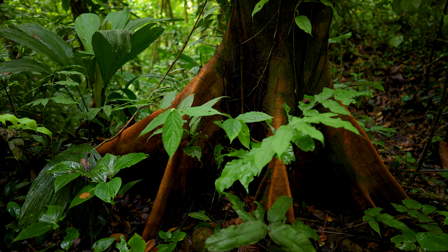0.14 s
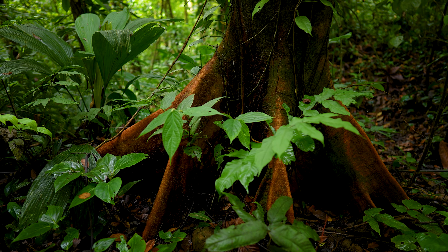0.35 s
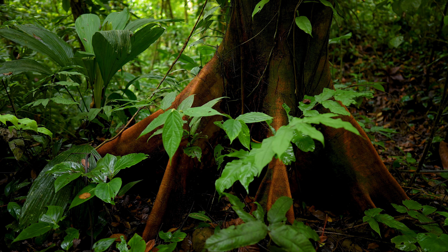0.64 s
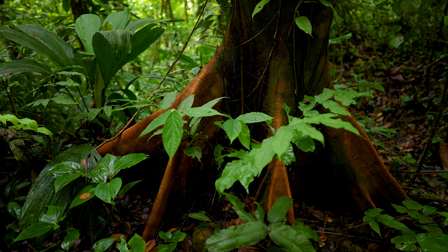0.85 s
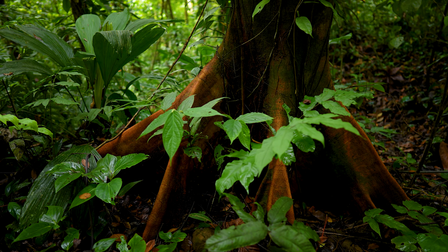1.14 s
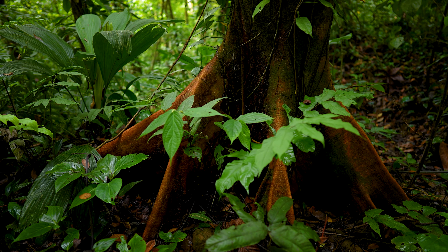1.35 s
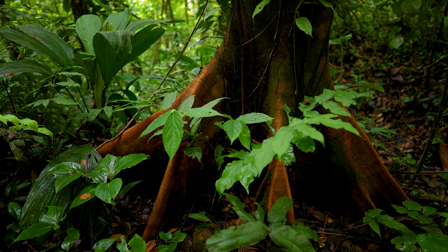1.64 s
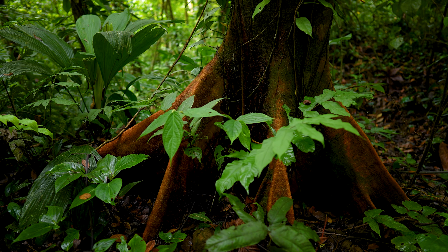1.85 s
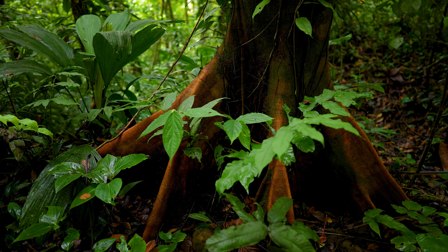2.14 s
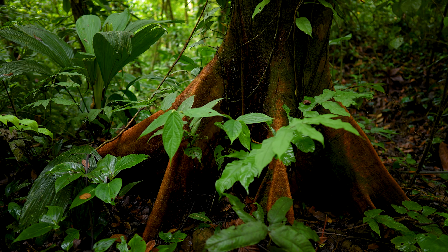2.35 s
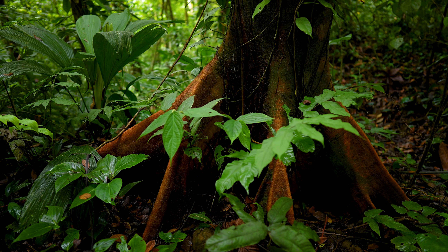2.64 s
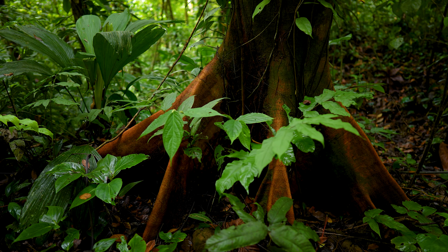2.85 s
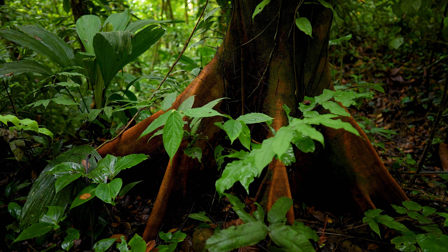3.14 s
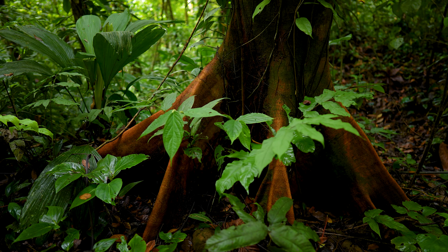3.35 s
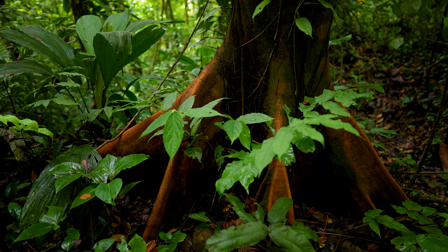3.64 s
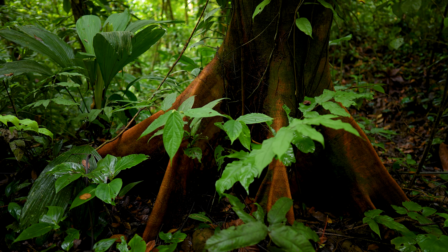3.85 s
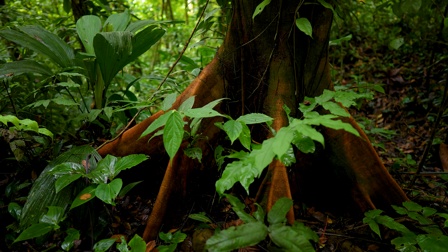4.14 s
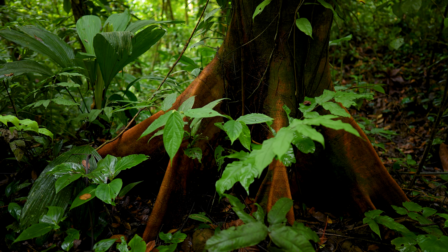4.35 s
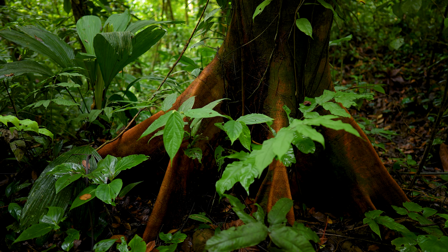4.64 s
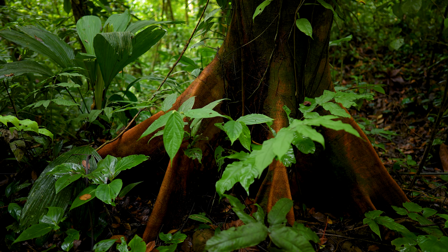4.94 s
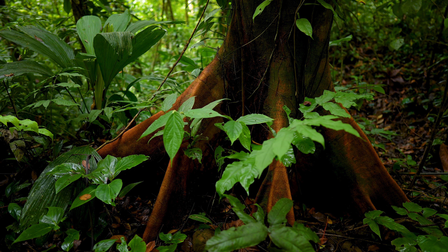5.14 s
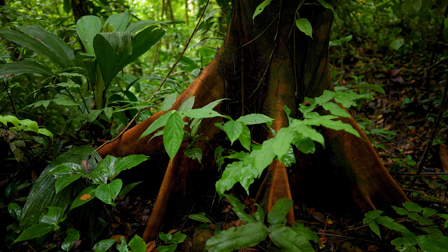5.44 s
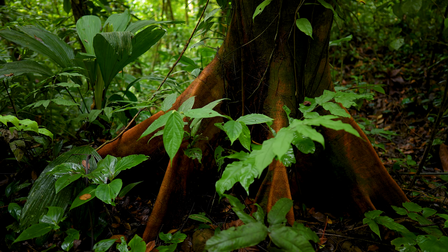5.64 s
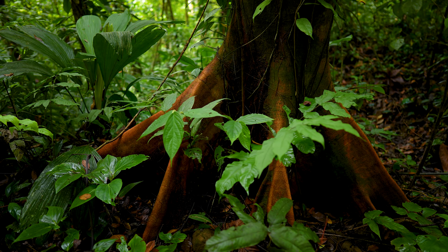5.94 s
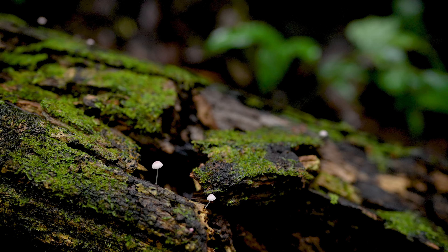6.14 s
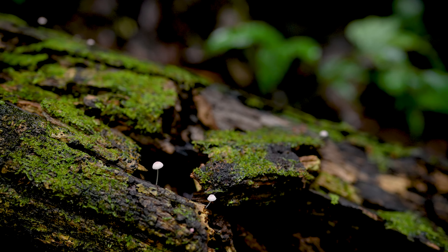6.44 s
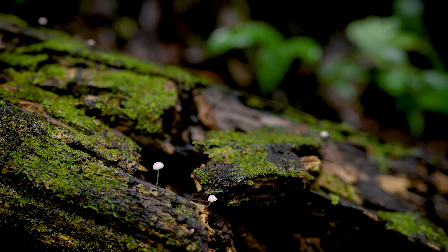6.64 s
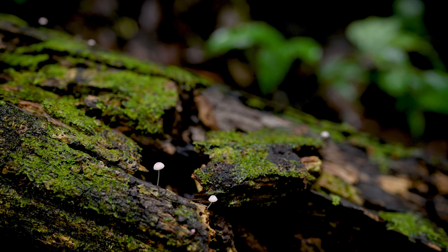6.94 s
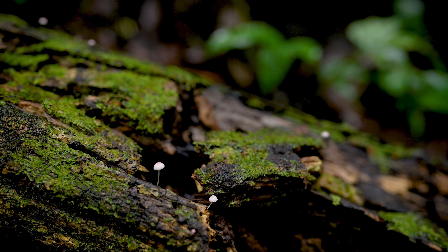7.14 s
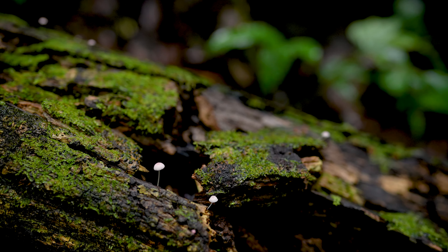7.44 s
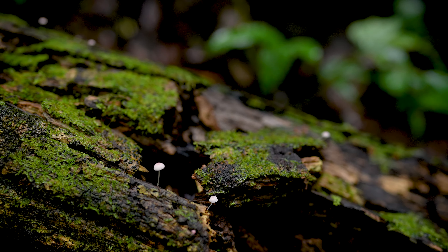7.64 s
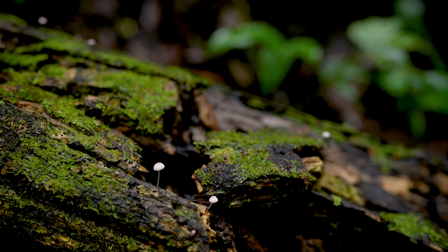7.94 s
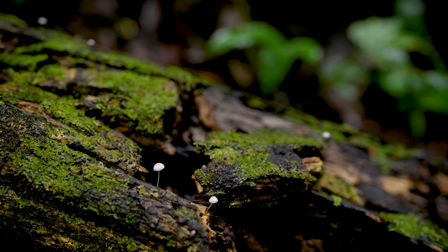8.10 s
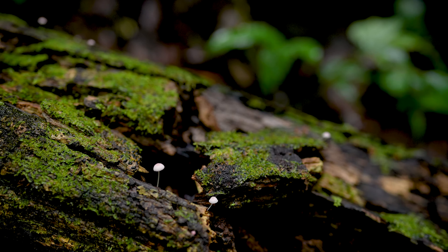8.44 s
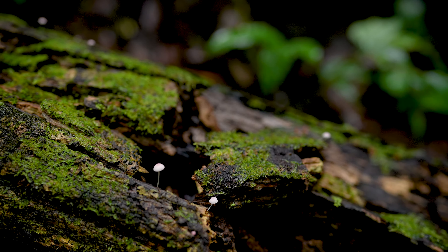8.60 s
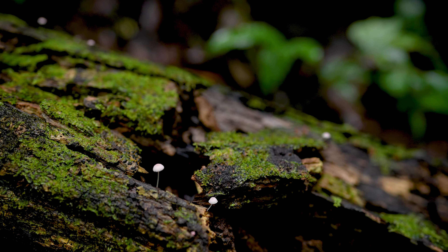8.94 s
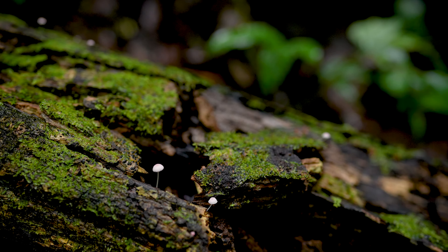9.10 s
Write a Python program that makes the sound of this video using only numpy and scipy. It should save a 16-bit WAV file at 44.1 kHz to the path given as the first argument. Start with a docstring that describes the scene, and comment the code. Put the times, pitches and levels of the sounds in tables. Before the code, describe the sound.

Daytime rainforest in stereo, beneath a big tree among wet leaves. A high insect drone never stops. A bird repeats short arched notes at about six a second, another yelps between them, and deeper in come paired low hoots, rising whistles and thin pips. Just after six seconds the spot changes abruptly: a loud cricket trills close by, the birds sound drier, and a quick warble rings out.

```python
"""A steady drone of crickets and katydids comes first, in a daytime rainforest heard from two spots in turn.
Over it a bird runs through long trills of arched notes, while a second yelps between them.
Deeper in the trees come double hoots, rising whistles, a warble, held notes, and a few drips on leaves.
Insect choirs are band-shaped noise, calls are tones along pitch contours, drips are damped leaf modes;
decaying random echoes give each singer its distance."""
import sys
import numpy as np
from scipy import signal
from scipy.fft import rfft, irfft, next_fast_len
from scipy.io import wavfile
from scipy.ndimage import uniform_filter1d

SR = 44100
rng = np.random.default_rng(int(sys.argv[2]) if len(sys.argv) > 2 else 0)


def inscribe(sig):
    """Save sig as 16-bit PCM at rate SR to the path in sys.argv[1].

    A 1-D sig is mono; a 2-D sig holds one channel per row.
    Samples are clipped to [-1, 1] before scaling.
    """
    pcm = np.round(np.clip(np.atleast_2d(sig).T, -1, 1) * 32767)
    wavfile.write(sys.argv[1], SR, pcm.astype(np.int16))


N = 408807
TIME = np.arange(N) / SR
MOVE_S = 6.175  # the listening spot changes
CUTOFF_HZ = 15200
WASH_DB = -52.5
YELP_HZ, BUZZ_HZ = 1277, 6335
PIP_LENGTH_S = .07
FULL_PITCH_HZ, TRILL_DB_PER_OCTAVE = 1242, 27  # lower trill notes are softer

# Source levels below are those before echo, panning and the gain of the source's own function.
# spectrum of the far forest's wash: pitch_hz, relative density_db (per Hz)
AIR = [(15, -10), (45, 1), (170, -2.5), (450, .5), (650, -1), (1100, 2.5), (1800, -1.4), (3100, -3.5),
       (4500, -4), (6600, -2), (7800, -22.5), (15500, -22.5)]
# insect choirs: first_spot_db, second_spot_db, pulse_rate_hz, pulse_depth (0-1),
# spectrum (pitch_hz, relative density_db per Hz)
CHOIRS = [ (-41.5, -39, 36, 0.063, [(6550, -46), (6850, -17.5), (7050, -7.5), (7230, -1), (7340, 1),
          (7420, -2.5), (7520, -19), (7700, -41), (8100, -46)]), (-44.5, -51.5, 71, 0.056, [(7900, -24),
          (8200, -14.5), (8450, -6.5), (8950, -1.5), (9400, -6.5), (10000, -17.5), (10700, -29),
          (11500, -71)]), (-50, -69, 9.1, 0.23, [(5400, -41), (5750, 5), (5900, 5.5), (6080, 13),
          (6250, 1.5), (6450, -31), (6700, -37)]), (-63, -50.5, 11, 0.38, [(3400, -4), (4000, -3.5),
          (4550, -1), (4850, -5.5), (5500, -1), (5700, 3.5), (5900, 11.5), (6020, -14), (6170, 7),
          (6320, -3), (6440, 7), (6600, -10)]), (-64, -62.5, 30, 0.26, [(2100, -25), (2350, -3.5),
          (2500, 7), (2770, 5), (2900, -23)]), (-74, -71.5, 46.5, .3, [(13800, -7), (14700, -7), (15000, 0),
          (15400, -34)])]
# bouts of a cricket, far and near: start_s, end_s, chirp_rate_hz, level_db
FAR_CRICKET = [(0, 6.17, 15.9, -42)]
NEAR_CRICKET = [(6.198, 7.1, 14.96, -30.2), (7.13, 7.65, 15.1, -39), (7.684, 8.7, 15.25, -30.5),
                (9.196, 9.27, 16.5, -31)]

# short insect buzzes: start_s, length_s, level_db
BUZZES = [(0.43, 0.33, -49.5), (2.435, 0.14, -45.5), (3.342, 0.2, -45), (4.926, 0.14, -45.5),
          (6.075, 0.1, -46)]
# sinking calls of distant birds, hoarse falling squawks, swells of a rasping insect:
# start_s, length_s, pitch_hz (mid-note), level_db
FAR_CALLS = [(0, 1, 2423, -57.5), (.05, 0.96, 2690, -59.5), (2.753, .38, 2470, -57.5),
             (3.55, 0.45, 2462, -56.5), (4.75, 0.83, 2703, -57.5), (8.95, 0.41, 2608, -57.5)]
SQUAWKS = [(5.05, 0.081, 1336, -45), (5.68, 0.29, 3140, -47), (5.84, 0.17, 2440, -51.5),
           (6.04, 0.1176, 1311, -48), (6.13, .32, 2538, -51)]
RASPS = [(1.85, 0.45, 5350, -54.5), (2.45, 1.2, 4760, -58), (6.15, 2.64, 4440, -55)]
# runs of thin pips: first_s, last_s, pip_count, pitch_hz, first_level_db, last_level_db
PIPINGS = [(1.719, 2.15, 5, 3470, -56, -52.5), (4.18, 4.541, 5, 3480, -53.5, -49),
           (4.64, 4.88, 3, 3490, -51, -62), (6.211, 6.28, 2, 3540, -52, -58),
           (7.9, 8.26, 8, 3460, -56, -61)]

# drips on leaves: start_s, level_db
DRIPS = [(3.125, -42), (7.909, -51)]
# modes of a leaf: pitch_hz, level_db, t60_s
LEAF = [(1540, 1.5, 0.047), (2340, 19, 0.0034), (2900, 6, 0.016), (4040, 6.5, 0.0093)]

# distant wail: bend_s, pitch_hz, level_db
WAILS = [(5.91, 1583, -41.5)]
# its fall and level end: offset_s from the bend, pitch_ratio, level_db
WAIL = [(-.08, 1.4, -8), (-.04, 1.22, -3), (0, 1.01, -0.5), (0.101, .98, 0.5), (.15, .85, -24)]
# rising whistles: rise_start_s, pitch_hz, level_db
WHISTLES = [(1.055, 1760, -45.5), (5.705, 1765, -47)]
# plunge, level stretch, long rise: offset_s from the start of the rise, pitch_ratio, level_db
WHISTLE = [(-.268, 2.0, -2), (-.248, 1.55, -4), (-.232, 1.2, -7), (-.21, 1.07, -13), (-.14, 1.01, -13),
           (0, 1, -13), (.06, 1.11, -6), (.115, 1.32, -3.5), (.16, 1.52, -1.5)]
# hoots, in pairs: time_s, pitch_hz, level_db
HOOTS = [(.985, 380, -40), (1.3, 376, -39.5), (2.085, 441, -47.5), (2.42, 443, -47.5), (6.96, 441, -48),
         (7.305, 444, -47.5)]
# rising first hoot, then level second hoot: offset_s from its time, pitch_ratio, level_db
RISING_HOOT = [(-.055, 0.8, -11.5), (-.033, .96, -4.5), (0, 1.01, 0.5), (0.02, 1.04, 2.5),
               (0.041, 1.33, -24)]
LEVEL_HOOT = [(-.05, 0.94, -20), (-.03, 0.99, 0), (.015, 1.0, -3), (.045, 0.83, -35)]

# songbird's syllables: offset_s from the turn, pitch_ratio, level_db
SWOOP = [(-.037, 0.94, -19), (-.022, 1.14, -1.5), (-.008, 1.05, -3), (0, 1, -1), (.008, 1.12, 3.5),
         (0.018, 1.43, -4), (0.028, 1.32, 5.5), (.04, 1.08, -18)]
LOW_SWOOP = [(-.052, .92, -22), (-.035, 1.13, -1), (-.012, 1.02, -2.5), (.005, 1, -0.5), (.016, 1.3, 4.5),
             (0.025, 1.44, 0), (.036, 1.1, -6), (.052, .82, -9)]
SLIDE = [(-.04, 1.69, -12), (-.017, 1.4, 1), (0, 1, -1), (.02, .82, -7), (0.039, .66, -17.5)]
CHIP = [(-.02, 0.82, -17), (-.006, .99, -2), (.003, 1.01, 1), (0.021, 1.16, -3), (.034, .9, -5),
        (.046, .88, -6), (.056, 0.83, -24)]
PIP = [(-.02, 0.88, -11), (0, 1, 8), (.012, 1.02, -12)]
# its song: time_s into the song, pitch_hz, level_db, syllable
SONG = [(.037, 4600, -32, SWOOP), (.165, 3774, -32.5, LOW_SWOOP), (.25, 3400, -44.5, PIP),
        (.373, 4880, -31.5, SWOOP), (.525, 4210, -31.5, SLIDE), (.584, 4346, -28, CHIP)]
# sung far off, then nearby: start_s, level_db, echo_db, echo_t60_s, echo_build_s, pan_db
SONGS = [(.955, -11.5, 22, 1.44, 0.037, 0.5), (7.055, -0.5, 1, 0.56, 0.0022, -1.5)]

# yelps: break_s (where the pitch breaks down), level_db
YELPS = [(0.141, -38.5), (0.487, -40), (0.781, -38.5), (1.075, -39.5), (2.124, -40.5), (2.851, -40),
         (3.623, -42), (4.471, -40.5), (5.031, -40.5), (5.17, -46.5), (6.189, -40), (6.419, -38),
         (6.671, -39.5), (6.901, -39), (7.333, -39), (7.647, -39.5), (7.914, -38), (8.189, -41),
         (8.446, -39), (8.769, -39.5), (9.045, -38.5), (9.296, -38.5)]
# one yelp: offset_s from the break, pitch_ratio, level_db
YELP = [(-.047, .48, -21), (-.038, 0.97, -5), (-.025, 1.01, 0), (-.008, .93, -11), (0, .95, 5.5),
        (.007, .68, -14), (.016, .62, -16.5), (.03, .46, -17.5)]

# trill runs of even pace, far and near: first_s, last_s, note_count, level_db (at full pitch)
FAR_RUNS = [(.368, 1.189, 5, -35.7), (1.368, 2.09, 5, -34.3), (2.246, 2.558, 3, -34.7),
            (2.742, 3.033, 3, -34.2), (3.172, 3.988, 7, -34.2), (4.12, 4.92, 7, -35.5),
            (5.092, 5.433, 3, -35.5), (5.763, 5.763, 1, -42), (6.1, 6.1, 1, -35)]
NEAR_RUNS = [(6.246, 6.823, 4, -36), (7.003, 7.372, 3, -35.4), (7.571, 7.757, 2, -35.2),
             (7.964, 8.374, 3, -36), (8.596, 8.596, 1, -33.5)]
# the trill holds its pitch, then sinks as the bird tires: time_s, pitch_hz (reference of the arch)
FAR_PITCH = [(.36, 1237), (3.3, 1263), (4.52, 1237), (4.65, 1055), (5.43, 900), (5.76, 1240)]
NEAR_PITCH = [(6.24, 1249), (7.96, 1242), (8.38, 1200), (8.586, 926.5)]
# far note, a scoop into a short top; near note, a full arch: offset_s from the top, pitch_ratio, level_db
SCOOP = [(-.028, .72, -16), (-.016, .86, -9.5), (-.008, 1.025, -2.5), (.003, 1.02, -.5), (.011, 1.0, -3),
         (.015, .88, -16), (.036, .6, -29)]
ARCH = [(-.028, .6, -23), (-.018, .76, -11.5), (-.012, .9, -8.5), (-.007, 1.035, 0), (.01, .985, 1.2),
        (.014, .85, -11), (.019, .68, -14), (.028, .55, -27)]


def from_db(db):
    """Level to amplitude: twenty decibels per factor of ten."""
    return 10 ** (np.asarray(db) / 20)


def rms_one(x):
    """Normalization to unit effective value."""
    return x / np.sqrt(np.mean(x ** 2) + 1e-20)


def drift(rate_hz):
    """Low-passed noise: smooth chance of spread 1 that turns about `rate_hz` times a second."""
    size = next_fast_len(N)
    lowpass = 1 / (1 + (np.fft.rfftfreq(size, 1 / SR) / rate_hz) ** 4)
    return rms_one(irfft(rfft(rng.standard_normal(size)) * lowpass, size)[:N])


def diffuse(spectrum, alike_below_hz=150):
    """Diffuse field: shaped noise of rms 1, partly alike at both ears only for long waves."""
    size = next_fast_len(N)
    hz = np.fft.rfftfreq(size, 1 / SR) + 1
    points, db = np.transpose(sorted(spectrum))
    gain = from_db(np.interp(np.log(hz), np.log(points), db, -np.inf, -np.inf))
    alike = .5 / (1 + (hz / alike_below_hz) ** 2)
    mid, side = rfft(rng.standard_normal((2, size))) * gain
    ears = np.sqrt(1 + alike) * mid + np.sqrt(1 - alike) * side * [[1], [-1]]
    return rms_one(irfft(ears, size)[:, :N])


def forest(x, wet_db, t60, pan_db=0., lag_s=0., build_s=0.0036):
    """Multiple scattering: echoes from trunks and leaves build and die; power is roughly kept before panning."""
    t = np.arange(SR) / SR
    envelope = from_db(-60 * t / t60) * (1 - np.exp(-t / build_s))
    scatter = rng.standard_normal((2, SR)) * envelope
    echoes = signal.fftconvolve(x[None], scatter, axes=1)[:, :N]
    echoes *= x.std() / echoes.std(axis=1, keepdims=True)
    direct = np.array([x, np.roll(x, round(lag_s * SR))])  # the right ear hears it later by lag_s
    blend = (direct + from_db(wet_db) * echoes) / np.hypot(1, from_db(wet_db))
    return blend * from_db([[pan_db / 2], [-pan_db / 2]])


def echoed(x, delay_s, echo_db):
    """Single reflection: a big trunk throws the call back once."""
    lag = max(round(delay_s * SR), 1)
    return x + from_db(echo_db) * np.pad(x, (lag, 0))[:N]


def hoarse(x, rough, rate_hz):
    """Random amplitude modulation: a tone's strength flutters, with its power roughly kept."""
    return x * (1 + rough * drift(rate_hz)) / np.hypot(1, rough)


def mix_in(out, start_s, sound):
    """Superposition: adds a sound in place at its time."""
    i = max(int(start_s * SR), 0)
    out[i:i + len(sound)] += sound[:max(N - i, 0)]


def syllable(contour, overtones_db, throat_hz):
    """Harmonic source and throat filter: a tone's start and wave; overtones above throat_hz are damped."""
    s, hz, db = np.transpose(sorted(contour))
    t = np.arange(s[0], s[-1], 1 / SR)
    hz = uniform_filter1d(np.interp(t, s, hz), size=200)
    phase = 2 * np.pi * np.cumsum(hz) / SR
    tone = np.sin(phase)
    for k, overtone_db in enumerate(overtones_db, 2):
        damping = np.hypot(1, (k * hz / throat_hz) ** 12)
        tone += from_db(overtone_db) * np.sin(k * phase) / damping
    envelope = from_db(np.interp(t, s, db)) * signal.windows.tukey(len(t), .1)
    return s[0], np.sqrt(2) * envelope * tone


def calls(notes, shape, overtones_db, throat_hz, spread=0.064):
    """Scaled contours: one shape at each note's time, pitch and level, its length and sweep varying a little."""
    out = np.zeros(N)
    variations = 1 + spread * rng.standard_normal((len(notes), 2))
    for (s, hz, db), (stretch, sweep) in zip(notes, variations):
        contour = [(s + dt * stretch, hz * ratio ** sweep, db + d) for dt, ratio, d in shape]
        mix_in(out, *syllable(contour, overtones_db, throat_hz))
    return out


def held(notes, fall, waver_hz):
    """Frequency modulation: tones swell and fade, sink by the share `fall` of their pitch and waver."""
    out, waver = np.zeros(N), drift(175.4)
    for start, length, pitch_hz, db in notes:
        count = max(int(length * SR), 2)
        glide_hz = pitch_hz * (1 - fall * np.linspace(-.5, .5, count))
        hz = glide_hz + waver_hz * np.roll(waver, -int(start * SR))[:count]
        tone = np.sqrt(2) * np.sin(2 * np.pi * np.cumsum(hz) / SR)
        mix_in(out, start, from_db(db) * signal.windows.tukey(count, .4) * tone)
    return out


def air():
    """Diffuse noise: the even wash of the far forest."""
    return from_db(WASH_DB) * diffuse(AIR)


def choirs():
    """Incoherent sum: countless insects blur into bands; at the first spot nearer ones make each throb."""
    out = 0
    for first_db, second_db, rate, depth, spectrum in CHOIRS:
        strokes = 2 * np.pi * np.cumsum(rate * (1 + 0.019 * drift(3.1))) / SR
        throb = 1 + depth * (TIME < MOVE_S) * (np.sin(strokes) + .5 * np.sin(strokes / 3))
        level_db = np.where(TIME < MOVE_S, first_db, second_db) + .6 * drift(3)
        out = out + from_db(level_db) * throb * diffuse(spectrum)
    return out


def chirps(bouts, uneven_db, pitch_hz=7335, sag_hz=130, stroke_s=.015, strokes_db=(1.3, 1.0, -15)):
    """Stridulation: three wing strokes a chirp, the last weak; the pitch sags as each stroke slows."""
    out, t = np.zeros(N), np.linspace(-1, 1, int(stroke_s * SR))
    for start, end, rate, db in bouts:
        for chirp in np.arange(start, end, 1 / rate):
            for k, stroke_db in enumerate(strokes_db):
                off_hz, off_db = rng.normal(0, [35, uneven_db])
                hz = pitch_hz + off_hz - sag_hz * t / 2
                tone = np.sqrt(2) * np.sin(2 * np.pi * np.cumsum(hz) / SR)
                stroke = from_db(db + stroke_db + off_db) * np.cos(np.pi * t / 2) * tone
                mix_in(out, chirp + k / len(strokes_db) / rate - stroke_s / 2, stroke)
    return out


def crickets():
    """Direct-to-echo ratio as distance: an uneven one off to the right, then a loud one close by."""
    far = forest(chirps(FAR_CRICKET, uneven_db=4.0), wet_db=3, t60=0.52, pan_db=-10)
    near = chirps(NEAR_CRICKET, uneven_db=0.0)
    return far + forest(near, wet_db=-7.5, t60=.42, pan_db=1.5, lag_s=-.00002)


def held_notes():
    """Modulated tones from deep in the trees: each kind has its own fall and hoarseness."""
    buzzes = held([(s, length, BUZZ_HZ, db) for s, length, db in BUZZES], fall=-0.0041, waver_hz=26)
    far_calls = held(FAR_CALLS, fall=.04, waver_hz=43.2)
    squawks = held(SQUAWKS, fall=0.114, waver_hz=190.2)
    rasps = held(RASPS, fall=0, waver_hz=479.6)
    return forest(buzzes + far_calls + squawks + rasps, wet_db=7.5, t60=1.0)


def piping():
    """Near-pure tones: a thin whistle in quick pips that swell or fade through each run."""
    pips = []
    for first, last, count, hz, first_db, last_db in PIPINGS:
        for s, db in np.linspace((first, first_db), (last, last_db), round(count)):
            pips.append((s - PIP_LENGTH_S / 2, PIP_LENGTH_S, hz, db))
    return forest(held(pips, fall=-0.0044, waver_hz=25), wet_db=4, t60=1.56)


def drips():
    """Impulse response: a drop knocks the damped modes of a leaf."""
    out, t = np.zeros(N), np.arange(SR // 20) / SR
    knock = sum(from_db(db - 60 * t / t60) * np.sin(2 * np.pi * hz * t) for hz, db, t60 in LEAF)
    for s, db in DRIPS:
        mix_in(out, s, from_db(db) * knock)
    return forest(out, wet_db=-13, t60=0.15)


def wails():
    """Gliding tone with a strong flutter: a distant wail falls, then levels out."""
    wail = calls(WAILS, WAIL, [-14], throat_hz=3630, spread=0.0207)
    return forest(hoarse(wail, rough=0.52, rate_hz=330), wet_db=6.5, t60=0.8)


def whistles():
    """Gliding harmonics: a plunge, a level stretch and a long rise, more echo than direct sound."""
    notes = calls(WHISTLES, WHISTLE, [-14, -18], throat_hz=4570, spread=0.023)
    notes = hoarse(notes, rough=0.11, rate_hz=190)
    return from_db(8.5) * forest(notes, wet_db=9, t60=1.3, pan_db=2.5)


def hoots():
    """Nearly pure low tones: the first of each pair rises, the second stays level."""
    first = calls(HOOTS[::2], RISING_HOOT, [-32], throat_hz=900)
    second = calls(HOOTS[1::2], LEVEL_HOOT, [-32], throat_hz=901)
    return forest(first + second, wet_db=-6.5, t60=0.77, pan_db=-2.5, lag_s=-0.00065)


def songbird():
    """Rapid frequency sweeps: three swoops and a pip, a downward slide and a chip; distance blurs them."""
    out = 0
    for start, song_db, wet_db, t60, build_s, pan_db in SONGS:
        song = np.zeros(N)
        for s, hz, db, shape in SONG:
            contour = [(start + s + dt, hz * ratio, song_db + db + d) for dt, ratio, d in shape]
            mix_in(song, *syllable(contour, [-38], throat_hz=12950))
        song = echoed(hoarse(song, rough=0.23, rate_hz=240), delay_s=.005, echo_db=-7.5)
        out = out + forest(song, wet_db, t60, pan_db, build_s=build_s)
    return out


def yelps():
    """Pitch break: the second bird's tone jumps up, holds and drops away."""
    notes = calls([(s, YELP_HZ, db) for s, db in YELPS], YELP, [-16], throat_hz=1920)
    return from_db(1) * forest(notes, wet_db=0, t60=0.56, pan_db=0.5)


def trill_notes(runs, pitch):
    """Loudness tied to pitch: notes (time_s, pitch_hz, level_db), evenly spaced in each run."""
    notes = []
    for first, last, count, db in runs:
        notes += [(s, db) for s in np.linspace(first, last, round(count))]
    s, db = np.transpose(notes)
    hz = np.interp(s, *np.transpose(pitch))
    return np.transpose([s, hz, db + TRILL_DB_PER_OCTAVE * np.log2(hz / FULL_PITCH_HZ)])


def trills():
    """Arched frequency sweeps: from afar, fluttering and thrown back by a trunk; then from nearby."""
    far = calls(trill_notes(FAR_RUNS, FAR_PITCH), SCOOP, [-19], throat_hz=1660, spread=0.1006)
    far = hoarse(echoed(far, delay_s=.031, echo_db=-8), rough=0.36, rate_hz=33.5)
    far = forest(far, wet_db=-6.0, t60=0.62, pan_db=3.8, lag_s=0.00023)
    near = calls(trill_notes(NEAR_RUNS, NEAR_PITCH), ARCH, [-1.5], throat_hz=1930)
    near = forest(near, wet_db=-6, t60=0.44, pan_db=-2, lag_s=.00006)
    return from_db(-1.0) * far + from_db(3.5) * near


def scene(chorus_pan_db=-0.15):
    """Superposition of all sources, the chorus leaning slightly right."""
    chorus = (air() + choirs()) * from_db([[chorus_pan_db / 2], [-chorus_pan_db / 2]])
    background = chorus + crickets() + held_notes() + piping() + drips()
    return background + wails() + whistles() + hoots() + songbird() + yelps() + trills()


def record(dry):
    """Band limitation: an elliptic low-pass cuts the top steeply."""
    lowpass = signal.ellip(10, .1, 80, CUTOFF_HZ, fs=SR, output="sos")
    return signal.sosfilt(lowpass, dry)


dry = scene()
out = record(dry)
inscribe(out)
```